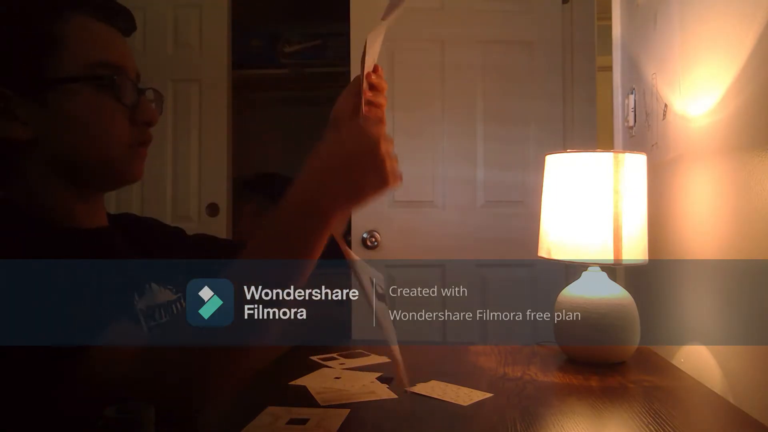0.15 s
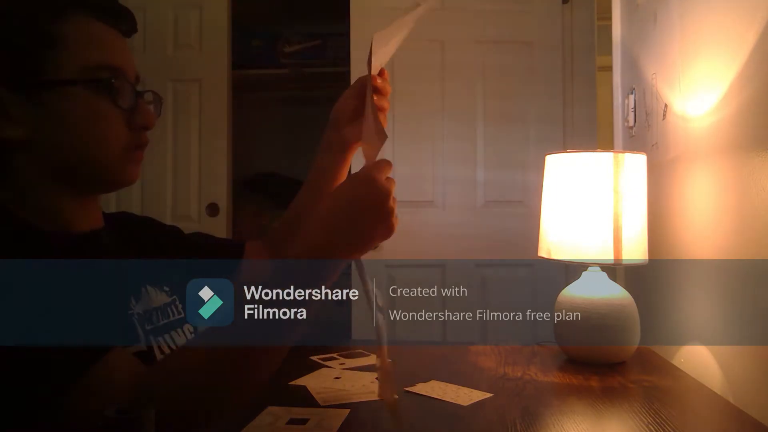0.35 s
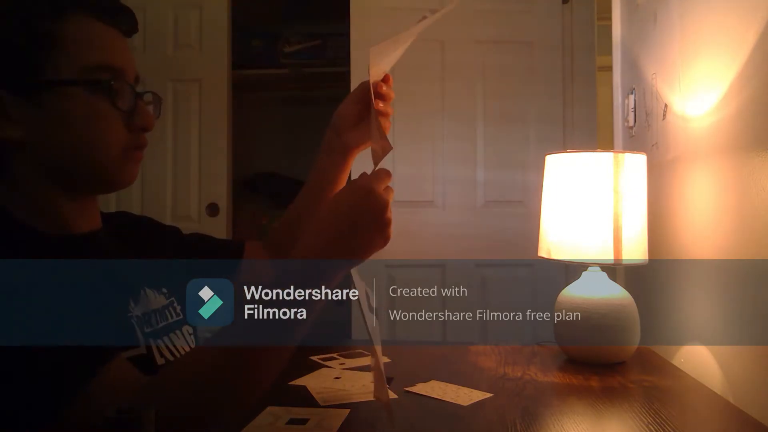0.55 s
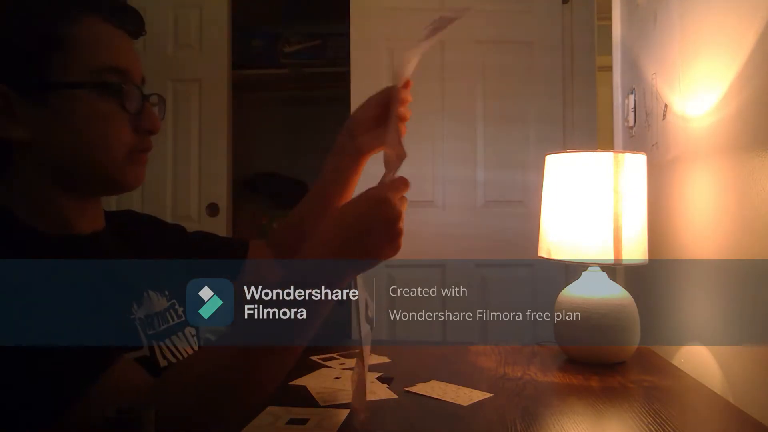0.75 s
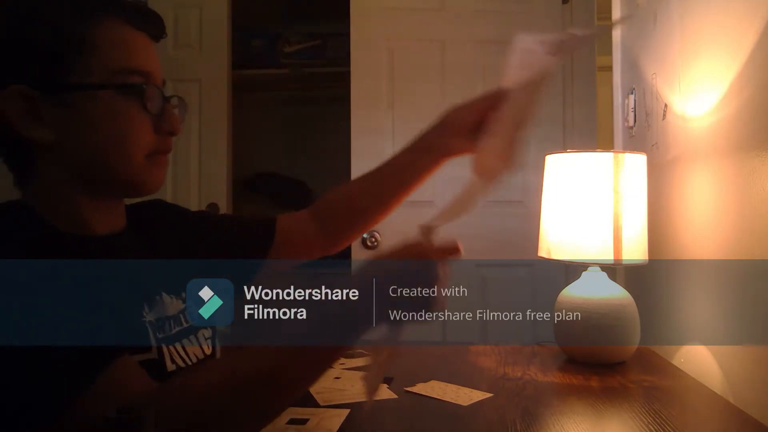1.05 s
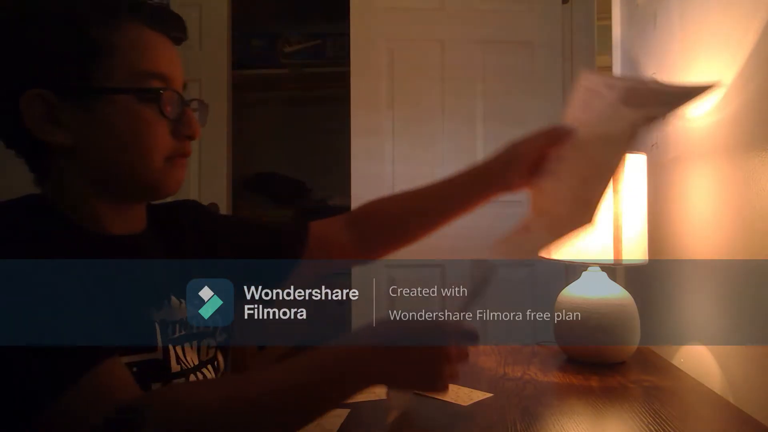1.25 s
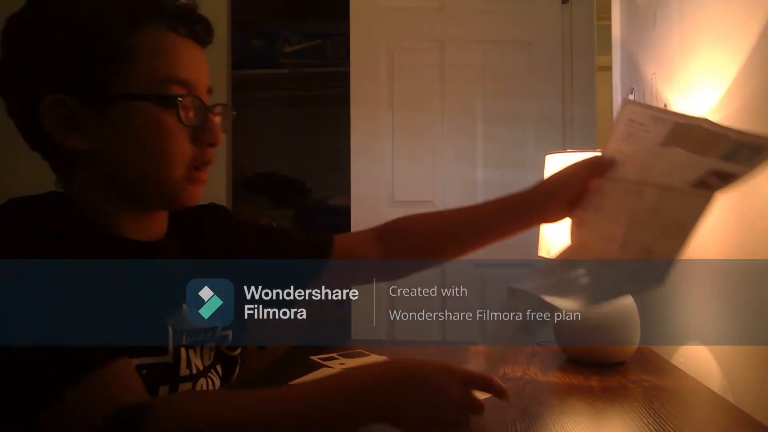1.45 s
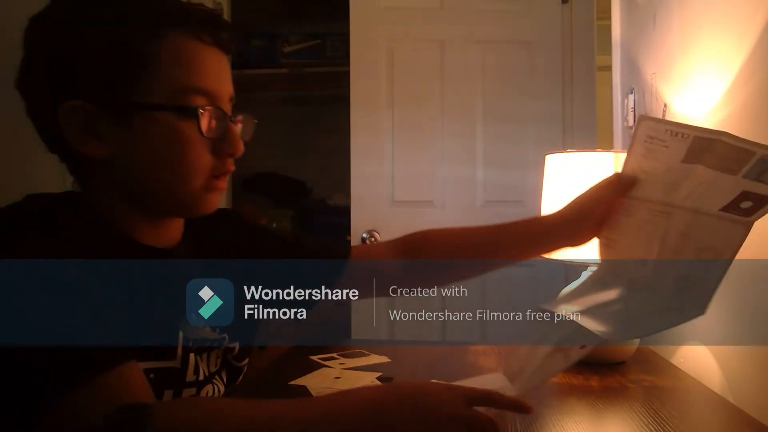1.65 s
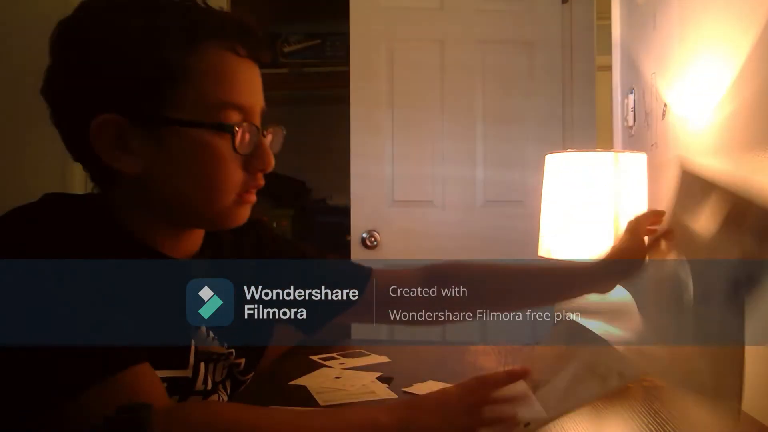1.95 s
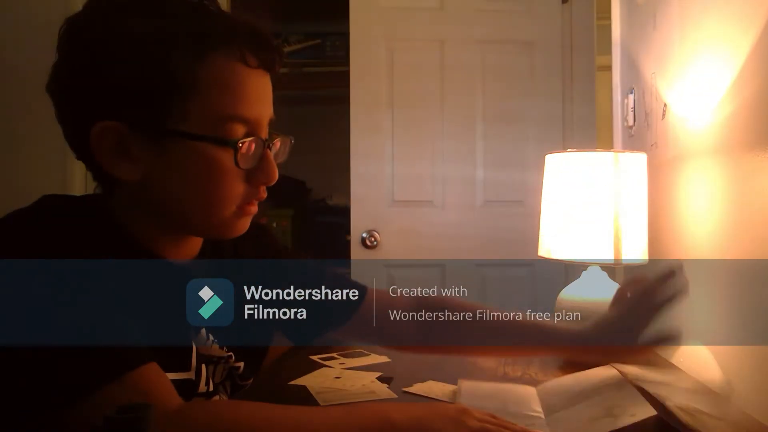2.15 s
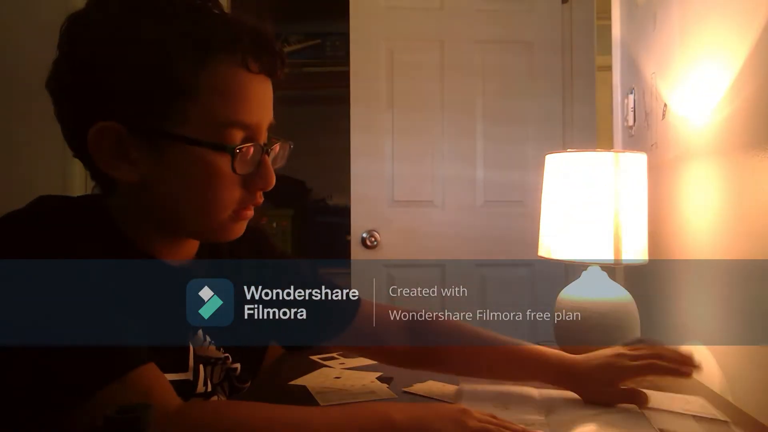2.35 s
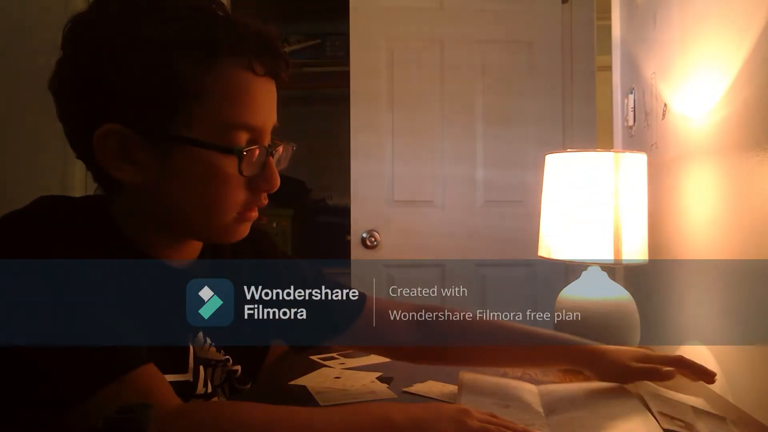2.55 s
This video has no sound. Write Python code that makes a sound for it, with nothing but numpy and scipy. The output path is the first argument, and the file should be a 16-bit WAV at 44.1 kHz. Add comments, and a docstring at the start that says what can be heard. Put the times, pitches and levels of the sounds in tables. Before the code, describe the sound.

A large paper sheet is handled over a wooden desk in a quiet room with low wavering hum and thin hiss. Very faint rustles open, two crisp snaps come around 1.0 s, then soft rustling. From 1.7 to 2.0 s it flutters brightly with small clicks, crumples loudly with desk thumps at 2.1 to 2.2 s, then slides briefly from 2.3 s and fades into faint rustle.

```python
"""Faint rustles of a large sheet of paper being fingered come first, over a low wavering hum and thin hiss.
In this quiet room the sheet snaps, flutters brightly above a wooden desk, crumples onto it and slides briefly.
Random crease clicks and friction noise make the rustle, flutter, crumple and slide; struck modes make the snaps.
Bumps of the hand and the crumpling ring the desk top; filtered noise and a drifting sine are the background."""
import sys
import numpy as np
from scipy import signal
from scipy.io import wavfile
from scipy.ndimage import uniform_filter1d

SR = 44100
rng = np.random.default_rng(int(sys.argv[2]) if len(sys.argv) > 2 else 0)


def invert_db(x):
    """Field ratio 10**(x/20) for x, a level in decibels (scalar or array-like)."""
    u = np.asarray(x, float) / 20
    return 10 ** u


def wav_out(sig):
    """Save sig, one row per channel (or a flat mono array), as 16-bit PCM at SR to the path in sys.argv[1]."""
    wavfile.write(sys.argv[1], SR, np.round(np.clip(np.atleast_2d(sig).T, -1, 1) * 32767).astype(np.int16))


N = 119070

# modes of the wooden desk top: pitch_hz, level_db [relative], t60_s
DESK_MODES = [(60.05, 1.5, 0.43), (120, -7, .12), (150, 5.5, 0.1), (218, -5.5, .08), (313, -8.5, 0.06),
              (434, -1, 0.15), (489, -3.5, 0.057), (570, -1.5, 0.073), (907, -1, 0.095),
              (1160, -2.5, 0.074), (1280, -24, 0.039), (1402, -6, 0.17)]


def rms_one(x):
    """Scale to rms 1."""
    return x / np.sqrt(np.mean(x ** 2) + 1e-20)


def in_time(rows):
    """Columns of a curve table at every sample, and a gate open over its span with 1 ms edges."""
    s, *columns = np.transpose(rows)
    t = np.arange(N) / SR
    gate = np.clip(np.minimum(t - s[0], s[-1] - t) / .001 + 1, 0, 1)
    return [gate] + [np.interp(t, s, c) for c in columns]


def at_hz(points, hz):
    """Read a spectrum on a log-frequency axis."""
    pitch_hz, value = np.array(points).T
    return np.interp(np.log(hz), np.log(pitch_hz), value)


def drift(rate_hz):
    """Slow random wandering of spread 1: noise through two low-pass poles at rate_hz, every 40 samples."""
    r = np.exp(-80 * np.pi * rate_hz / SR)
    slow = signal.lfilter([1], [1, -2 * r, r * r], rng.standard_normal(N // 40 + 2002))[2000:]
    return np.interp(np.arange(N) / 40, np.arange(len(slow)), rms_one(slow))


def ring(clicks, hz, t60_s):
    """A unit click sets a sine of height 1 ringing, down 60 dB after t60_s."""
    r, w = invert_db(-60 / (t60_s * SR)), 2 * np.pi * hz / SR
    return signal.lfilter([0, np.sin(w)], [1, -2 * r * np.cos(w), r * r], clicks + 1e-18)


def crackle(per_s, spread_db, smooth):
    """Two pairs of random tiny crease clicks of uneven size over smooth friction noise."""
    shape = (2, 2, N)
    sizes = invert_db(spread_db * np.minimum(rng.exponential(1, shape), 5))
    sizes = sizes * rng.choice([-1, 1], shape)
    clicks = sizes * (rng.random(shape) < per_s / SR)
    return rms_one(clicks) + smooth * rng.standard_normal(shape)


def coloured(source, spectrum, patchy_db, tilt_db=0, gate=1, step=.4, per_s=14.2):
    """Stereo bands, step octaves wide, with own level, flicker and likeness; rms 1 where the gate is open."""
    # how alike left and right are: pitch_hz, likeness [kept within 0 to 1 below]
    likeness = [(60, 0.73), (180, 1), (550, 0.58), (1650, 0.38), (4970, -0.82), (15000, -1.6)]
    out, edges = 0, 22 * 2 ** np.arange(0, 9.7, step)
    for k, (low, high) in enumerate(zip(edges, edges[1:])):
        hz = np.sqrt(low * high)
        if hz < spectrum[0][0] * .8:
            continue
        band = signal.butter(2, [low, high], "band", fs=SR, output="sos")
        mid, side = signal.sosfilt(band, source[k % 2])
        alike = np.clip(at_hz(likeness, hz), 0, 1)
        gain = invert_db(at_hz(spectrum, hz) + patchy_db * drift(per_s) + tilt_db * np.log2(hz / 1500))
        out = out + gain * (np.sqrt(1 + alike) * mid + np.sqrt(1 - alike) * side * [[1], [-1]])
    power = np.mean(out ** 2, axis=0)
    # a moving tilt is levelled over 0.1 s, so that it changes colour rather than loudness
    level = uniform_filter1d(power, size=4410) if np.ndim(tilt_db) else np.mean(power)
    return gate * out / np.sqrt(level + 1e-20)


def room_tone():
    """Noise of the quiet room in tenth-octave bands, heard with a patchy flicker laid over it."""
    # colour of the quiet room: pitch_hz, level_db [per Hz, relative]
    spectrum = [(53, -52.5), (90, -18), (107, -8.5), (184, -4), (367, -16.5), (530, -14), (644, -24),
                (971, -26), (2310, -27), (3260, -19.5), (5360, -15), (5840, -20), (11200, -34),
                (15800, -37)]
    white = rng.standard_normal((2, 2, N))
    return invert_db(-66.5) * coloured(white, spectrum, patchy_db=4, step=1 / 10, per_s=4.85)


def hum():
    """A sine wavering in pitch and level, and noise twice through narrow resonances, mono when low."""
    # narrow bands of noise: pitch_hz, width_hz [of one pass], level_db
    resonances = [(36.3, 31, -65), (120, 44, -70), (5250, 310, -75.5)]
    tone_hz, pitch_spread_hz, tone_db, level_spread_db = 58.9, 2.98, -60, 3
    phase = 2 * np.pi * np.cumsum(tone_hz + pitch_spread_hz * drift(2)) / SR
    out = invert_db(tone_db + level_spread_db * drift(14)) * np.sqrt(2) * np.sin(phase)
    for hz, width_hz, db in resonances:
        r = np.exp(-np.pi * width_hz / SR)
        a = [1, -2 * r * np.cos(2 * np.pi * hz / SR), r * r]
        white = rng.standard_normal((1 if hz < 999 else 2, N + SR))
        once = signal.lfilter([1, -1], a, white)
        twice = signal.lfilter([1, -1], a, once)[:, SR:]  # the first second only settles the filters
        out = out + invert_db(db) * rms_one(twice)
    return out


def room(x):
    """Six feedback delays a side, duller on every round, stand for the reflections of the walls."""
    t60_s, wall_cut_hz = .2, 3500
    out, dull = np.zeros((2, N)), np.exp(-2 * np.pi * wall_cut_hz / SR)
    for k, lag in enumerate((rng.uniform(.008, .03, 12) * SR).astype(int)):
        loop, gain, state = x.copy(), invert_db(-60 * lag / SR / t60_s), [0.]
        for i in range(lag, N, lag):
            back, state = signal.lfilter([gain * (1 - dull)], [1, -dull], loop[i - lag:i], zi=state)
            loop[i:i + lag] += back[:N - i]
        out[k % 2] += (loop - x) * (-1) ** (k // 2)  # reflections only
    return out


def rustles():
    """Each rustle is crackle in one band, streaked by random narrow resonances, rising fast and dying away."""
    # soft rustles of the held sheet: start_s, length_s, level_db [before pan and flicker], centre_hz, width_octaves
    events = [(0.0, 0.031, -70.5, 4860, 1.3), (.09, 0.077, -70.5, 1944, .9), (.3, 0.11, -75, 7020, 0.82),
              (.45, 0.039, -87, 3970, 1.2), (.527, 0.014, -65, 2780, 0.2), (.55, 0.13, -77, 2730, .4),
              (.57, 0.11, -70, 1715, 0.45), (.73, 0.043, -66, 4860, 0.59), (.935, 0.064, -59, 3420, 1.3),
              (.975, .04, -52, 1836, 1.07), (.953, 0.018, -55.5, 1048, 0.057),
              (.955, 0.0082, -53.5, 1520, 0.29), (1.04, 0.041, -57.5, 2400, 1.46),
              (1.062, 0.021, -70, 2350, 0.45), (.94, 0.052, -64, 470, 1.37), (1.035, 0.013, -55, 287, 1.57),
              (1.12, .1, -73.5, 405, 2.2), (1.2, 0.081, -63.5, 1960, 1.4), (1.25, 0.15, -66, 3234, 0.34),
              (1.27, 0.35, -78, 1400, 0.28), (1.48, 0.18, -72, 1836, 1.06), (1.7, 0.037, -72, 3830, 0.25),
              (1.855, 0.02, -51, 911, 4.66), (2.047, 0.021, -49.5, 1204, 1.73),
              (2.28, .05, -70.5, 8850, 0.88), (2.33, 0.083, -55.5, 160, 0.74),
              (1.96, 0.019, -73, 9800, 1.2), (1.45, .22, -78.5, 7970, 1.8), (2.57, 0.16, -76.5, 5160, 2)]
    attack_share, release_s, pan_db = .2, 0.041, 3  # attack as share of the length; left over right
    streak_width_hz, streaks_db = 44.3, -0.5
    streak_t60_s = np.log(1000) / (np.pi * streak_width_hz)
    out, t = np.zeros((2, N)), np.arange(N) / SR
    source = crackle(per_s=1900.0, spread_db=1.5, smooth=1.0)
    for k, (s, length, db, hz, octaves) in enumerate(events):
        i, j = int(s * SR), min(int((s + length + 6 * release_s) * SR), N)
        u = t[i:j] - s
        rise = np.clip(u / (attack_share * length), 0, 1)
        fall = np.exp(-np.maximum(u - length, 0) / release_s)
        edges = np.clip(hz * 2 ** (octaves * np.array([-.5, .5])), 30, .45 * SR)
        band = signal.butter(2, edges, "band", fs=SR, output="sos")
        mid, side = signal.sosfilt(band, source[k % 2, :, i:j])
        streaks_hz = hz * 2 ** (octaves * rng.uniform(-.5, 0.94, size=12))
        streaks = sum(ring(mid, f, streak_t60_s) for f in streaks_hz)
        mid = rms_one(mid) + invert_db(streaks_db) * rms_one(streaks)
        stereo = rms_one(mid + 1.09 * rms_one(side) * [[1], [-1]])
        out[:, i:j] += invert_db(db) * rise * fall * stereo
    return out * invert_db([[pan_db / 2], [-pan_db / 2]]) * invert_db(2.2 * drift(18))


def snaps():
    """Each crease gives a short noise burst into fourteen brief panel modes spread over its band."""
    # creases that snap: start_s, peak_db [before pan], centre_hz, width_octaves, left_over_right_db
    creases = [(.98, -26, 2210, 0.74, 4.5), (1.041, -29, 2450, 0.53, 11), (1.7154, -50, 3600, 0.35, 7),
               (1.779, -44, 5100, 0.86, 16), (1.807, -49.5, 3900, 1.7, -4), (1.854, -36, 3900, 0.36, 14),
               (1.866, -49, 1490, 0.1, 7), (1.884, -41, 4200, 0.59, 9), (1.923, -41.5, 5330, 0.72, 5),
               (1.971, -56, 4200, 1.3, -0.5), (1.994, -46.5, 3050, 0.22, 3),
               (2.0487, -50.5, 1300, 1.95, 28), (2.0747, -25.5, 2480, 1.7, 8.5),
               (2.1053, -24.5, 2760, 1.06, 6), (2.1232, -29, 6970, 0.52, 4),
               (2.1533, -17.5, 2470, 1.81, 12), (2.1532, -33.5, 10000, 2, 7), (2.2883, -46, 2080, .4, -8),
               (2.306, -39, 2650, 1.1, 14)]
    rise_s, fall_s, t60_cycles, alike = .0003, .0013, 11.0, .7  # alike: left-right likeness of the bursts
    out, u = np.zeros((2, N + SR)), np.arange(1500) / SR
    draws = rng.standard_normal((len(creases), 2, 1514))
    for (s, db, hz, octaves, pan_db), draw in zip(creases, draws):
        mid, side = draw[:, 14:] * (1 - np.exp(-u / rise_s)) * np.exp(-u / fall_s)
        burst = np.sqrt(1 + alike) * mid + np.sqrt(1 - alike) * side * [[1], [-1]]
        places = np.linspace(-.5, .5, num=14) + 0.019 * draw[0, :14]
        modes_hz = np.clip(hz * 2 ** (octaves * places), 100, .4 * SR)
        one = sum(ring(burst, f, t60_cycles / f) * (-1) ** k for k, f in enumerate(modes_hz))
        one = signal.lfilter([1, -1], [1, -.9], one)  # takes the lows out
        one = invert_db(db) * one / np.abs(one).max()
        i = int(s * SR)
        out[:, i:i + 1500] += one * invert_db([[pan_db / 2], [-pan_db / 2]])
    return out[:, :N]


def flutter():
    """Bright dense crackle as the sheet swings through the air."""
    # the swing: start_s, level_db [before the trim below]
    swing = [(1.68, -67), (1.686, -78.5), (1.788, -61), (1.846, -63.5), (1.858, -53.5), (1.874, -61),
             (1.886, -48.5), (1.902, -58.5), (1.93, -54), (1.94, -59), (1.996, -63), (2.04, -74)]
    # its colour: pitch_hz, level_db [per Hz, relative]
    colour = [(530, -66), (900, -11.5), (1170, -40), (1290, -20), (1450, 16), (1660, -17.5), (3660, 5.5),
              (8990, -12.5), (15800, -36)]
    gate, db = in_time(swing)
    source = crackle(per_s=4000.0, spread_db=0.0, smooth=0.89)
    sheet = coloured(source, colour, patchy_db=3.5, gate=gate)
    return invert_db(db + 6.5) * sheet * invert_db([[2.2], [-2.2]])


def slide():
    """Friction noise with an echo loop in the thin gap between the sheet and the desk."""
    # the sheet slides flat: start_s, level_db [before the trim below]
    motion = [(2.26, -49), (2.272, -55), (2.302, -42.5), (2.446, -61), (2.502, -75.5), (2.52, -71.5)]
    # its colour ahead of the echo: pitch_hz, level_db [per Hz, relative]
    colour = [(180, -38), (300, 3), (825, -6.5), (1190, -1.5), (1380, -5.5), (2090, -1.5), (8410, -25.5),
              (15800, -52.5)]
    gap_hz, gap_echo = 1040, 0.49  # approximate spacing of the echo's peaks, strength of each return
    gate, db = in_time(motion)
    sheet = coloured(crackle(per_s=3400.0, spread_db=0.5, smooth=0.86), colour, patchy_db=0.6)
    loop = np.r_[1, np.zeros(int(SR / gap_hz) - 1), -gap_echo]
    return gate * invert_db(db - 1.5) * rms_one(signal.lfilter([1], loop, sheet))


def desk_bumps():
    """Each bump of the hand is a soft push that rings the modes of the desk top."""
    # bumps: start_s, push_db [before softening and ringing], hardness_hz [low-pass of the push]
    bumps = [(0.992, -47.5, 120), (1.09, -52, 58.3), (1.9, -52.5, 151), (2.079, -39.5, 69.7),
             (2.112, -37, 300), (2.127, -36.5, 300), (2.155, -36, 300), (2.191, -56, 90),
             (2.209, -34.5, 76), (2.3, -40, 90), (2.334, -43, 120)]
    out = np.zeros(N)
    for s, db, hardness_hz in bumps:
        push = np.zeros(SR // 2)
        push[0] = invert_db(db)
        soft = signal.sosfilt(signal.butter(2, hardness_hz, fs=SR, output="sos"), push)
        one = sum(invert_db(level_db) * ring(soft, hz, t60_s) for hz, level_db, t60_s in DESK_MODES)
        i = int(s * SR)
        out[i:i + SR // 2] += one[:N - i]
    out = signal.sosfilt(signal.butter(2, 42, "high", fs=SR, output="sos"), out)
    return out * invert_db([[.5], [-.5]])


def desk_shaken(crumple):
    """The crumpling sheet also drives the desk modes above 130 Hz."""
    modes = [mode for mode in DESK_MODES if mode[0] > 130]
    return sum(invert_db(-41 + db) * ring(crumple, hz, t60_s) for hz, db, t60_s in modes)


def landing():
    """The sheet crumples on the desk: coarse crackle over a wide range, its brightness shifting."""
    # the landing: start_s, level_db [before the trim below], brightness_db_per_octave
    contact = [(2.076, -25, 0), (2.09, -39.5, -0.5), (2.1, -34, -2.5), (2.125, -29.5, 0.2),
               (2.14, -29.5, -1.5), (2.155, -30.5, 6.3), (2.17, -31.5, -1), (2.2, -35.5, -2),
               (2.23, -45, -1), (2.265, -53, -1), (2.3, -53, 7)]
    # its colour before that tilt: pitch_hz, level_db [per Hz, relative]
    colour = [(110, -46.5), (180, -4), (353, -10), (403, -9.5), (504, -8), (575, 5), (868, -2.5),
              (953, 0.5), (2720, -1.5), (5040, -10.5), (15800, -57.5)]
    gate, db, tilt_db = in_time(contact)
    source = crackle(per_s=2500.0, spread_db=2.5, smooth=0.47)
    sheet = coloured(source, colour, patchy_db=2.0, tilt_db=tilt_db, gate=gate)
    return invert_db(db - 2.0) * sheet * invert_db([[1.1], [-1.1]])


def scene():
    """Paper and desk over room tone and hum; only the snaps are given reflections of the room."""
    background = room_tone() + hum()
    cracks, crumple = snaps(), landing()
    reflections = invert_db(-9) * room(cracks.mean(axis=0))
    paper = cracks + reflections + rustles() + flutter() + crumple + slide()
    return background + paper + desk_shaken(crumple) + desk_bumps()


def low_pass(x):
    """Removes everything above the highest recorded frequency."""
    return signal.sosfilt(signal.butter(12, 16450, fs=SR, output="sos"), x)


def record(dry):
    """The finished stereo mix as it is delivered."""
    return low_pass(dry)


dry = scene()
out = record(dry)
wav_out(out)
```